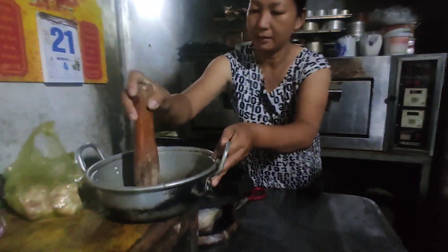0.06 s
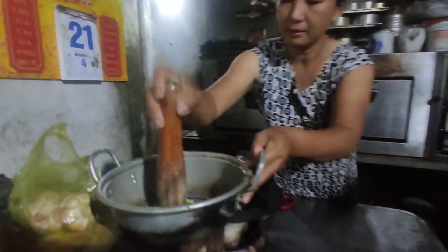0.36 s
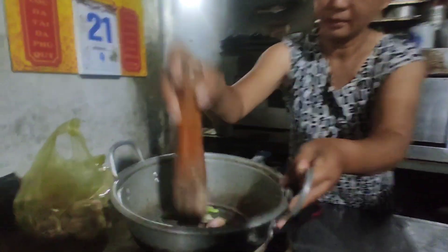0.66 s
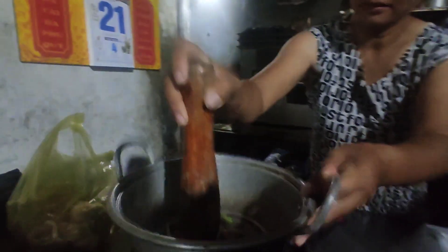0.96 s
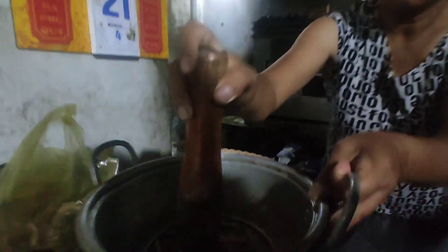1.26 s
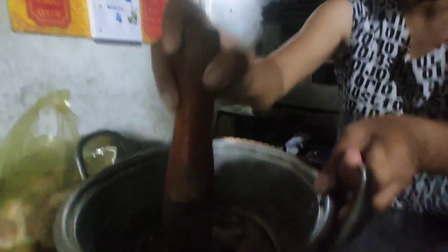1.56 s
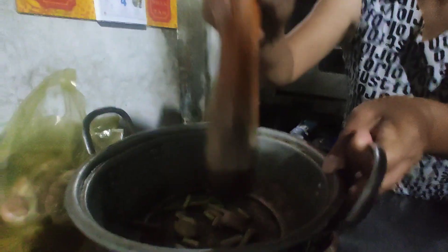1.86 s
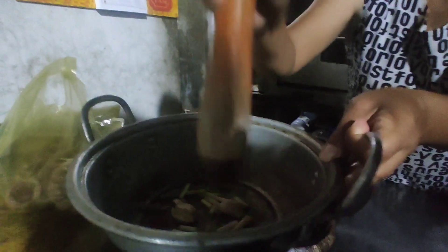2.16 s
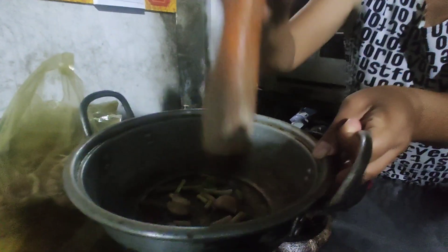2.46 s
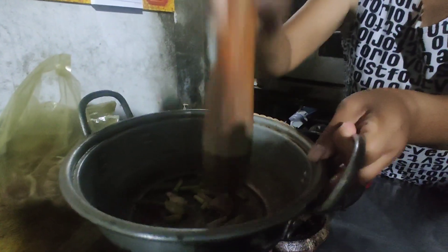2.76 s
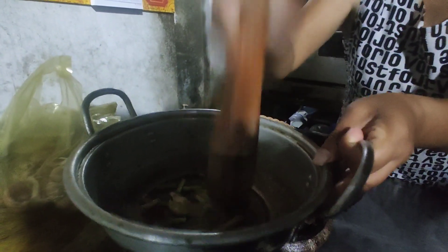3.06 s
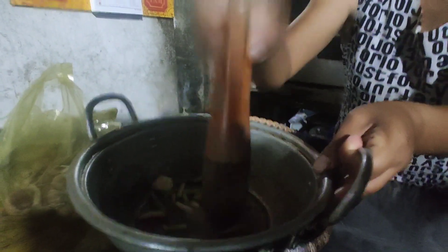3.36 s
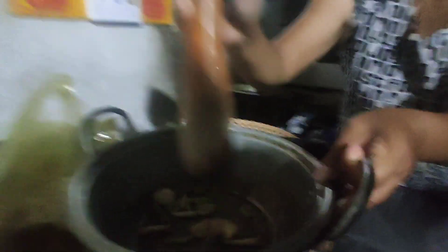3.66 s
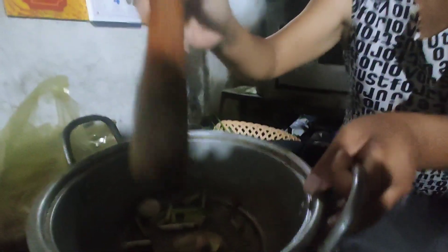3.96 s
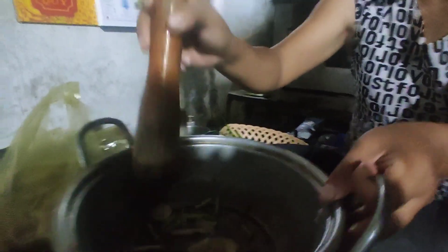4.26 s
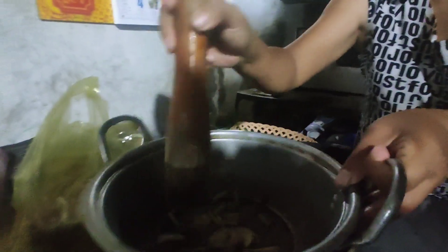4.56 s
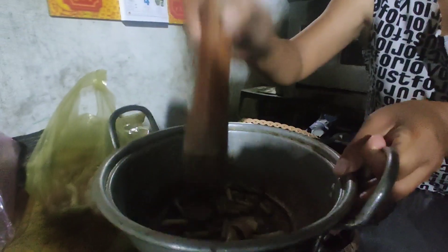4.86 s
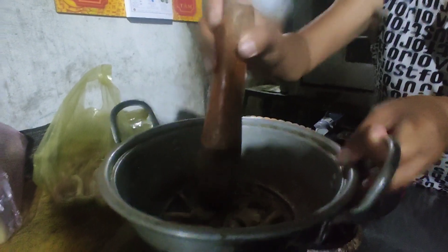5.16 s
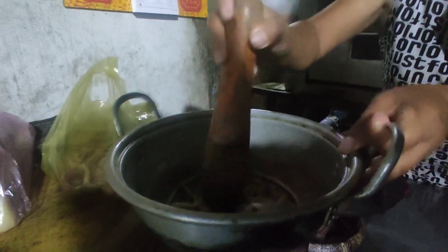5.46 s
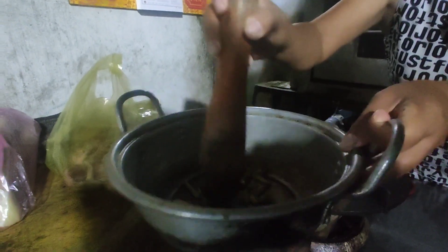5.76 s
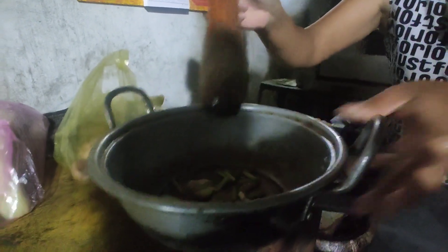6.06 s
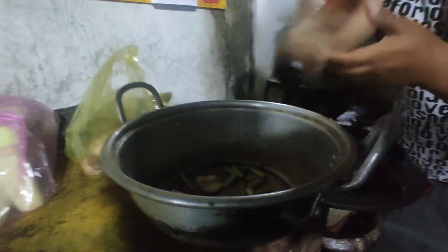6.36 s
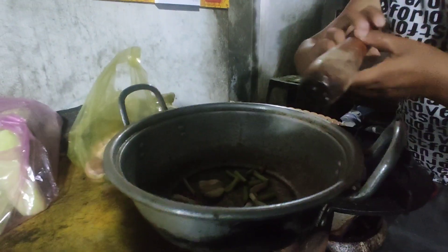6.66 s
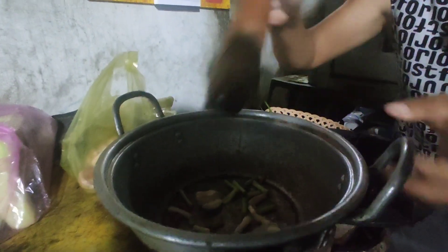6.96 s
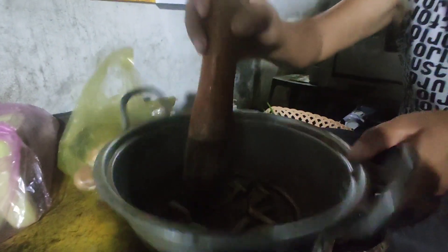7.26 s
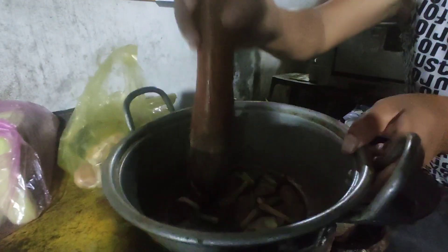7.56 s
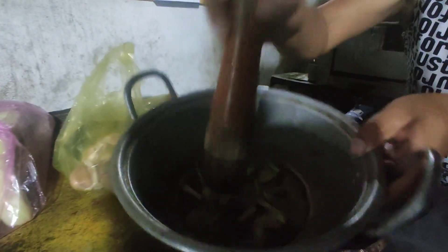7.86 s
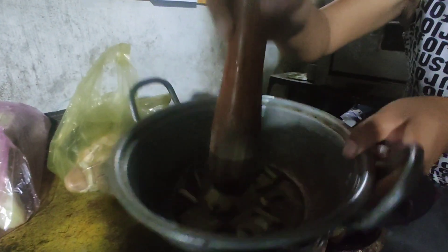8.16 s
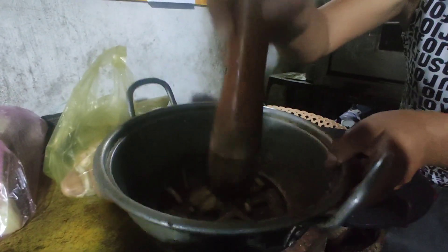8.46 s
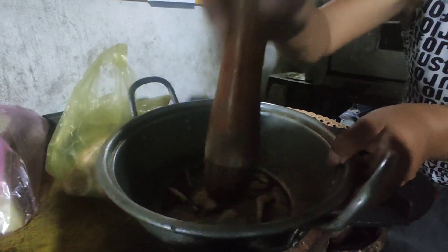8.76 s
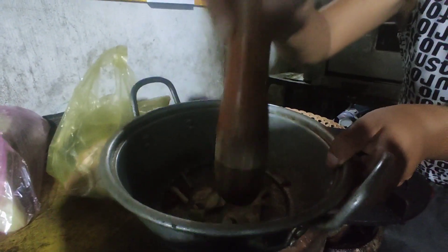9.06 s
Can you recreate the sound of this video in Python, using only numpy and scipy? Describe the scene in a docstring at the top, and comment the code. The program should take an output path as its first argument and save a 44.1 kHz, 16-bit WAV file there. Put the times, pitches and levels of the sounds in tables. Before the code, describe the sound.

Close, sharp knocks of a wooden pestle crushing stalks in a ringing metal pot, with light scrapes between blows in a small kitchen.

```python
"""A small hard-walled kitchen with a low appliance hum; two microphones close to a metal pot held by one handle.
A wooden pestle pounds herbs in it twelve times, scraping, squeaking and ticking between blows. Each blow
crushes stalks for a few milliseconds, shoves the pot's bottom and sets the metal clanging.
Near 4 s two dull double knocks come from across the room. Five more blows follow, then a pause with
a few scrapes, then the last seven."""
import sys
import numpy as np
from scipy import signal
from scipy.fft import rfft, irfft
from scipy.io import wavfile

SR = 44100
rng = np.random.default_rng(int(sys.argv[2]) if len(sys.argv) > 2 else 0)


def transcribe(u):
    """Save the signal u as a 16-bit wav file named by the first command-line argument.

    u: samples, shape (n,) or (channels, n), limited to [-1, 1]; the rate is SR.
    q: integer samples, one column per channel.
    """
    v = np.clip(np.atleast_2d(u).T, -1, 1)
    q = np.round(v * 32767).astype(np.int16)
    wavfile.write(sys.argv[1], SR, q)


N = 401751
LEAD, LENGTH = 1024, 32768  # samples before a contact, and in its whole sound
T = (np.arange(LENGTH) - LEAD) / SR  # time around one contact [s]
HZ = np.fft.rfftfreq(LENGTH, 1 / SR) + 1e-3
RUB_PEAK_S = 0.25  # scrapes and squeaks peak here on T

# room tone: (frequency [Hz], relative level [dB])
ROOM_TONE = [(15, 0.5), (35, -12), (65, 0.5), (100, -3), (160, -7.5), (230, -14.5), (310, -16), (750, -24),
             (1500, -28), (2700, -32), (4000, -36.5), (8400, -39.5), (10500, -52), (14000, -52)]
# the appliance's tones: (frequency [Hz], level [dB])
HUM_TONES = [(80.7, -59), (145.3, -54.5), (193.8, -59), (301, -68.5), (403.7, -71), (759, -71.5)]
# pestle blows: (time [s], landing spot, force [dB], hollow boost [dB], crush time [s],
# freedom of the pot to rebound [dB], shove frequency [Hz], rim ring [dB])
BLOWS = [(0.1358, "clank", 18, -5, 0.0043, -1.5, 282, -43),
         (0.4629, "clunk", 18.5, 2, 0.0043, -1.5, 344, -47),
         (0.776, "clang", 8.5, -0.5, 0.007, 0.5, 260, -48.5), (1.05, "ping", 8, 6, 0.0041, -2, 258, -48),
         (1.33, "clunk", 13, 7.5, 0.0043, -6.5, 273, -46.5),
         (1.6246, "clunk", 18.5, 5.5, .0035, -0.5, 275, -31),
         (1.9947, "clack", 21.5, -7, 0.0035, -6, 130, -58),
         (2.2956, "clank", 19.5, -7.5, 0.0036, -3.5, 147, -46),
         (2.5981, "ping", 16, -0.5, 0.0026, -5, 155, -51), (2.879, "tock", 16, 0, 0.0032, -7, 201, -61),
         (3.166, "clunk", 15.5, 2, 0.0041, -5, 328, -59), (3.4629, "clunk", 9, 3, 0.0038, -4, 262, -54.5),
         (4.7253, "clang", 4.5, 6.5, 0.0057, -3, 185, -70),
         (4.9784, "clang", 14.2, 0.5, 0.006, -2, 123, -43),
         (5.2464, "clink", 19.5, -7.5, 0.0044, -3, 252, -45),
         (5.5454, "clink", 15, 3, 0.0043, -1.5, 148, -41),
         (5.7994, "clang", 12.5, 0, 0.0046, -3.5, 140, -51),
         (7.274, "clang", 8, 6.5, 0.0089, -2.5, 129, -50), (7.546, "clang", 13, 3, .0035, -5, 153, -57),
         (7.8252, "tock", 21.5, -1, 0.0061, -0.5, 202, -40.5),
         (8.138, "tock", 5, 7.5, 0.0086, -3, 154, -54), (8.432, "clack", 22, -18, 0.0049, -8.5, 365, -68),
         (8.704, "clack", 18.5, -4.5, 0.0019, -2, 143, -41),
         (8.9759, "clack", 21.5, -1, 0.0025, -2, 223, -35.5)]
# landing spots on the pot's bottom, named for their sound, with three short resonances each:
# (knock [dB], knock [Hz], clang [dB], clang [Hz], ping [dB], ping [Hz], bright boost [dB])
LANDING_SPOTS = {"clunk": (4.3, 590, 10.3, 1304, 8.5, 6400, 0.42),
                 "clank": (1, 1749.5, 21, 2017.5, 3.5, 4150, -1),
                 "ping": (8.5, 557, 14, 2098, 25, 6200, -1), "clang": (0, 695, 10.5, 2242, 1, 4398, -2.5),
                 "clink": (8, 1380, 15, 2280, 7, 5500, 3.2), "tock": (9.5, 678, 7, 920, 7.5, 5197, -2),
                 "clack": (10, 1256, -0.5, 1783.5, 4, 2879.5, -5)}
# herbs crushed against metal: (frequency [Hz], relative level [dB])
CRUSH_COLOUR = [(30, -16.5), (70, 6), (150, 10), (300, 6.5), (600, 0), (900, -4.5), (1300, -2.5), (2000, 1),
                (3000, -3.5), (4500, -6), (7000, -8), (9000, -9.5), (11000, -25.5), (13500, -27.5)]
# modes of the held pot: (frequency [Hz], relative level [dB], t60 [s])
POT_MODES = [(148, 0.5, 0.38), (202.2, -6.5, 0.34), (277, -4.5, 0.48), (408.3, 0, 0.32), (533, -8.5, 0.29),
             (1750, -14.5, 0.53), (2070, -13, .25), (2640, -15, 0.51), (3810, -11.5, 0.26),
             (5760, -26, 0.39), (8122, -21, 0.27)]
# the kitchen's late decay: (frequency [Hz], t60 [s])
KITCHEN_DECAY = [(100, 0.29), (300, 0.54), (800, 0.52), (2000, 0.5), (5000, 0.45), (9000, 0.37),
                 (14000, 0.34)]
# drags over herbs and metal: (peak time [s], swell time [s], level [dB], low grinding boost [dB])
SCRAPES = [(0.305, 0.027, -39, -5), (0.902, 0.038, -40, -9), (3.925, 0.043, -36, 9),
           (4.346, 0.024, -41.5, 18.5), (4.433, 0.037, -38.5, -22), (5.95, 0.044, -33, 13),
           (6.771, 0.036, -54, 14.5), (7.371, 0.043, -48, 23.5), (7.521, 0.018, -40.5, 11.5),
           (7.614, 0.019, -35, 8), (8.334, 0.036, -33.5, 9)]
# the dragging pestle: (frequency [Hz], relative level [dB])
SCRAPE_COLOUR = [(100, 6.5), (500, -2), (1200, -1), (2400, 2.5), (4000, 0.5), (6500, -0.5), (9000, -5),
                 (11000, -16), (14000, -22)]
# rubs that catch one resonance: (peak time [s], swell time [s], frequency [Hz], level [dB])
SQUEAKS = [(0.306, 0.0074, 2830, -25), (4.917, 0.032, 6200, -36), (5.467, 0.059, 322, -24),
           (6.226, 0.015, 1300, -39), (6.791, 0.055, 2570, -43.5), (7.945, 0.011, 1474, -12.5)]
# light touches of pestle and bits on the pot: (time [s], relative level [dB], treble boost [dB])
TOUCHES = [(0.643, -26.5, -11), (1.1062, -34, 12.5), (3.123, -44.5, -4), (3.385, -43.5, 5),
           (3.5464, -33, -17), (4.369, -13, -16), (5.6994, -50.5, 20.5), (7.374, -26.5, -5),
           (8.2047, -37.5, 5.5), (8.3612, -37.5, 16)]
# tiny dry clicks right by the microphones: (time [s], relative level [dB])
CLOSE_CLICKS = [(1.94, -33), (3.66, -20)]
# a close click: (frequency [Hz], relative level [dB])
CLICK_COLOUR = [(100, -13), (600, 4.5), (1400, 6), (3000, -2.5), (8000, -12.5), (14000, -35.5)]
# dull knocks across the room: (time [s], level [dB])
FAR_KNOCKS = [(3.911, 16.5), (3.945, 9), (4.077, 9.5), (4.10, 4.5)]
# a far knock: (frequency [Hz], relative level [dB])
KNOCK_COLOUR = [(60, -5.5), (150, 5), (250, -8.5), (450, 3.5), (750, 1), (1250, 4), (1700, -10.5),
                (2300, -8.5), (3200, -26), (9000, -42)]
# how alike the two microphones hear the room: (frequency [Hz], correlation [clipped to 1])
MIC_LIKENESS = [(20, 0.5), (60, 2), (140, 0.69), (300, 0.8), (630, .5), (1300, 0), (15000, 0)]
# balance of the microphone ports: (frequency [Hz], left minus right [dB])
MIC_BALANCE = [(60, -1.5), (200, .5), (700, -0.5), (2500, 2), (4100, 0), (6200, -4.5), (7300, -0.5),
               (8300, 10), (10000, 2.5), (12000, -1.5), (14500, 2)]


def amp(db):
    """Decibels to gain."""
    return 10 ** (np.asarray(db) / 20)


def read(points, hz):
    """A table's value on a log-frequency axis."""
    table_hz, value = np.transpose(points)
    return np.interp(np.log(hz + 1), np.log(table_hz + 1), value)


def unit(x):
    """Scales to energy 1 a channel."""
    return x / np.sqrt((x ** 2).sum(-1).mean() + 1e-20)


def add(mix, time_s, sound):
    """Adds a sound so that its T = 0 falls at time_s."""
    start = round(time_s * SR) - LEAD
    part = mix[:, max(start, 0):start + sound.shape[-1]]
    part += sound[..., max(-start, 0):][..., :part.shape[-1]]


def colour(x, db):
    """Causal filter with the gain db over HZ: peaks ring after the contact, never before."""
    log_gain = np.log(amp(np.maximum(db, -100)))
    phase = -signal.hilbert(np.r_[log_gain, log_gain[-2:0:-1]]).imag[:len(HZ)]
    return irfft(rfft(x) * np.exp(log_gain + 1j * phase))


def bump(hz, octaves):
    """A smooth hill of height 1 over HZ."""
    return np.exp(-.5 * (np.log2(HZ / hz) / octaves) ** 2)


def shelf(hz):
    """Rises from 0 to 1 around hz."""
    return 1 / (1 + (hz / HZ) ** 4)


def resonance(hz, width_hz):
    """A resonance peak of height 1 over HZ."""
    return 1 / (1 + ((HZ - hz) / width_hz) ** 2)


def grains(samples):
    """Random steps, each held for so many samples."""
    return np.repeat(rng.standard_normal(LENGTH // samples), samples)


def diffuse(size):
    """White noise at two microphones, alike in the bass and unrelated in the treble."""
    left, other = rfft(rng.standard_normal((2, size)))
    likeness = np.clip(read(MIC_LIKENESS, np.fft.rfftfreq(size, 1 / SR)), -1, 1)
    right = likeness * left + np.sqrt(1 - likeness ** 2) * other
    return irfft(np.array([left, right]), size)


def room_tone(level_db=-48):
    """The kitchen's low rumble and faint hiss."""
    air = irfft(rfft(diffuse(N)) * amp(read(ROOM_TONE, np.fft.rfftfreq(N, 1 / SR))), N)
    return amp(level_db) * unit(air) * np.sqrt(N)


def appliance_hum(waver=0.53):
    """An appliance hums, the same in both microphones; each tone wavers in level and phase."""
    t = np.arange(N) / SR
    knots = np.linspace(0, t[-1], num=40)
    hum = np.zeros(N)
    for hz, db in HUM_TONES:
        swell, drift = (np.interp(t, knots, walk) for walk in rng.standard_normal((2, len(knots))))
        hum += np.sqrt(2) * amp(db) * (1 + waver * swell) * np.sin(2 * np.pi * hz * t + drift)
    return hum


def crunch(rise_s, fall_s, jolt=1.9, jolt_s=0.0013, grain_db=3):
    """Snapping fibres swell until the pestle bottoms out with a jolt; the metal's chatter then dies."""
    snaps = amp(grain_db * grains(32))
    envelope = np.exp(-np.where(T < 0, (T / rise_s) ** 2, T / fall_s))
    envelope += jolt * np.exp(-(T / jolt_s) ** 2)
    return unit(diffuse(LENGTH) * envelope * snaps)


def lesser_modes(depth_db=3.0):
    """The bottom's many lesser modes, in dB over HZ: each contact wakes its own chance set."""
    knots = np.linspace(0, SR / 2, num=220)
    return depth_db * np.interp(HZ, knots, rng.standard_normal(len(knots))) * shelf(600)


def heave(hz, lead_s=0.00098, slap_hz=430, slap_lag_s=0.00091, damping_cycles=2.2):
    """The bottom dips, slaps back as the pestle stops, then sways until the hand on the handle damps it."""
    cycles = hz * (T + lead_s)
    dip_phase = (np.pi * cycles) ** 2
    dip = (1 - 2 * dip_phase) * np.exp(-dip_phase)
    slap_phase = (np.pi * slap_hz * (T - slap_lag_s)) ** 2
    slap = (1 - 2 * slap_phase) * np.exp(-slap_phase)
    after_dip = np.maximum(cycles - 1 / 2, 0)
    sway = np.cos(2 * np.pi * cycles) * np.minimum(2 * after_dip, 1) * np.exp(-after_dip / damping_cycles)
    return dip - 0.38 * slap + 0.24 * sway


def ring(hz, t60, spread=1.0):
    """One dying mode; the higher it is, the more its phase can differ between the microphones."""
    after = np.maximum(T, 0)
    phase = spread * rng.uniform(-1.3, 1, (2, 1)) * min(hz / 900, np.pi)
    onset = 1 - np.exp(-after * SR / 64)
    return np.sin(2 * np.pi * hz * after + phase) * amp(-60 * after / t60) * onset


def room(early_t60=0.15, late_db=-5.0, build_s=0.0035):
    """Quick echoes from pot and near wall, then the kitchen's slower tail."""
    hz, t, spectra = signal.stft(diffuse(LENGTH), SR, nperseg=256)
    age = np.maximum(t - LEAD / SR, 0)
    decay = amp(-60 * age / read(KITCHEN_DECAY, hz)[:, None])
    late = signal.istft(spectra * decay, SR, nperseg=256)[1][:, :LENGTH]
    after = np.maximum(T, 0)
    early = diffuse(LENGTH) * amp(-60 * after / early_t60)
    swell = 1 - np.exp(-after / build_s)
    return unit(unit(early * swell) + amp(late_db) * unit(late * swell ** 2))


def crackle(per_s=45, fade_s=0.13):
    """Crushed stalks give a few tiny after-snaps as the pestle twists and lifts."""
    snaps = rng.exponential(1, LENGTH) * (rng.random(LENGTH) < per_s / SR)
    snaps *= (T > 0) * np.exp(-abs(T) / fade_s)
    return signal.fftconvolve(snaps[None], crunch(0.00032, 0.001), axes=1)[:, LEAD:LEAD + LENGTH]


def rim_song(hz=1587, t60=0.99, max_split_hz=16, seep_s=0.1):
    """Motion seeps from the bottom into the rim; not quite round, it rings as a close pair that beats."""
    mode = ring(hz, t60, spread=.5)
    twin = ring(hz + max_split_hz * rng.uniform(-1, 1), t60, spread=.5)
    return (mode + 0.66 * twin) * (1 - np.exp(-np.maximum(T, 0) / seep_s))


def blow(spot, force_db, hollow_db, crush_s, free_db, shove_hz, rim_db,
         usual_weight_db=16.5, usual_free_db=-2):
    """One close blow: a crunch through the pot's resonances, a low shove, ringing metal and the room."""
    knock_db, knock_hz, clang_db, clang_hz, ping_db, ping_hz, bright_db = spot
    tone_db = force_db + hollow_db * bump(270, 1.0) + bright_db * shelf(3600)
    spot_db = (knock_db * resonance(knock_hz, 65) + clang_db * resonance(clang_hz, 130)
               + ping_db * resonance(ping_hz, 260))
    spot_db = 13 * np.tanh(spot_db / 12)  # a soft limit keeps the strongest resonances broad and short
    body_db = tone_db + read(CRUSH_COLOUR, HZ) + lesser_modes()
    # a thick layer of herbs takes longer to crush and cushions the jolt
    contact = crunch(crush_s, fall_s=0.0063, jolt=2 * np.exp(-crush_s / 0.004))
    crack = colour(contact, body_db + spot_db - 7 * (1 - shelf(320)))
    after_snaps = colour(crackle(), body_db - 25 - 15 * (1 - shelf(3000)))
    echo = colour(room(), body_db + 0.43 * spot_db + free_db + 1)
    # a heavier blow shoves more, as does a pestle that stays down and stops the pot rebounding
    heavier_db, freer_db = force_db + hollow_db - usual_weight_db, free_db - usual_free_db
    shove = amp(-10.5 + heavier_db - 0.56 * freer_db) * heave(shove_hz)
    boom = amp(-15) * signal.fftconvolve(room(), shove[None], axes=1)[:, LEAD:LEAD + LENGTH]
    drive_db = tone_db + spot_db - 48
    metal = sum(amp(db + np.interp(hz, HZ, drive_db)) * ring(hz, t60) for hz, db, t60 in POT_MODES)
    rim = amp(rim_db) * rim_song()
    return crack + after_snaps + echo + shove + boom + metal + rim


def scrape(swell_s, level_db, grind_db, fall_ratio=1.2):
    """Little slips and coarser catches of stalk swell under one drag and fade a little more slowly."""
    t = T - RUB_PEAK_S
    slips, catches = grains(64), grains(256)
    stroke = np.exp(-.5 * (t / np.where(t < 0, swell_s, fall_ratio * swell_s)) ** 2)
    roughness = amp(slips + 1.5 * catches - 1.5)
    colour_db = level_db + read(SCRAPE_COLOUR, HZ) + grind_db * bump(516, 1.0)
    return colour(diffuse(LENGTH) * stroke * roughness, colour_db + lesser_modes())


def squeak(swell_s, hz, level_db):
    """Wood sliding on wet metal: a soft band of noise that swells and fades."""
    stroke = np.exp(-.5 * ((T - RUB_PEAK_S) / swell_s) ** 2)
    return colour(diffuse(LENGTH) * stroke, level_db - 40 * (1 - bump(hz, octaves=0.42)))


def touch(level_db, treble_db, gain_db=26, room_db=-7):
    """A light tap of wood or a flung bit, which briefly rings the pot's wall."""
    tap = crunch(0.0026, 0.005, jolt=0) + amp(room_db) * room()
    wall_db = 10 * sum(resonance(hz, 93) for hz in (1250, 2000, 4300))
    tilt_db = treble_db * shelf(3000) - 12 * (1 - shelf(450))
    return colour(tap, gain_db + level_db + read(CRUSH_COLOUR, HZ) + wall_db + tilt_db)


def close_click(level_db, gain_db=23, room_db=-20):
    """A single snap right by the microphones, so close and small that it barely wakes the room."""
    snap = crunch(0.00017, 0.00095, jolt=0) + amp(room_db) * room()
    return colour(snap, gain_db + level_db + read(CLICK_COLOUR, HZ))


def far_knock(level_db):
    """A dull knock across the kitchen, which reaches the microphones as all room sound."""
    echoes = room(early_t60=0.12, late_db=0.5, build_s=.001)
    return colour(echoes, level_db + read(KNOCK_COLOUR, HZ))


def scene():
    """The pot up close and the knocks farther off, over room tone and hum."""
    mix = np.zeros((2, N))
    for time_s, spot, *stroke in BLOWS:
        add(mix, time_s, blow(LANDING_SPOTS[spot], *stroke))
    for time_s, level_db, treble_db in TOUCHES:
        add(mix, time_s, touch(level_db, treble_db))
    for time_s, level_db in CLOSE_CLICKS:
        add(mix, time_s, close_click(level_db))
    for time_s, swell_s, level_db, grind_db in SCRAPES:
        add(mix, time_s - RUB_PEAK_S, scrape(swell_s, level_db, grind_db))
    for time_s, swell_s, hz, level_db in SQUEAKS:
        add(mix, time_s - RUB_PEAK_S, squeak(swell_s, hz, level_db))
    for time_s, level_db in FAR_KNOCKS:
        add(mix, time_s, far_knock(level_db))
    return mix + room_tone() + appliance_hum()


def record(dry):
    """Each microphone port has its own treble colour; peaks are rounded off; then the band limit."""
    ceiling, edge_hz = 0.92, 14300
    balance_db = read(MIC_BALANCE, np.fft.rfftfreq(N, 1 / SR))
    ports = amp(np.array([balance_db, -balance_db]) / 2)
    ported = irfft(rfft(dry) * ports / np.sqrt((ports ** 2).mean(0)), N)
    rounded = ported / (1 + (ported / ceiling) ** 6) ** (1 / 6)
    lowpass = signal.firwin(191, edge_hz, window=("kaiser", 9), fs=SR)
    return signal.oaconvolve(rounded, lowpass[None], "same")


dry = scene()
out = record(dry)
transcribe(out)
```